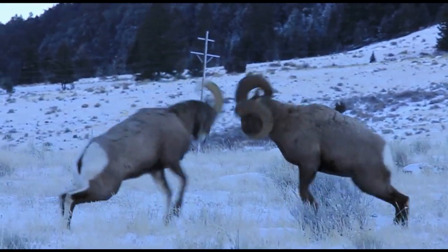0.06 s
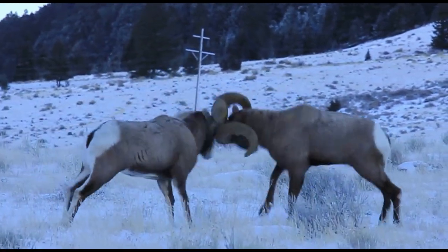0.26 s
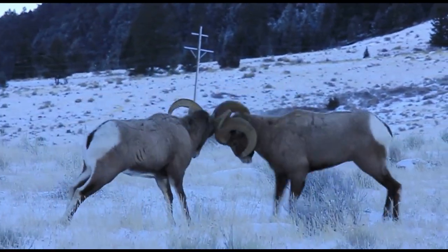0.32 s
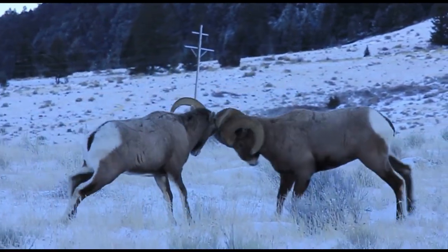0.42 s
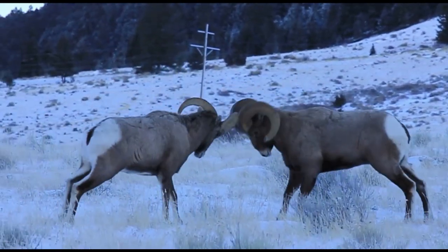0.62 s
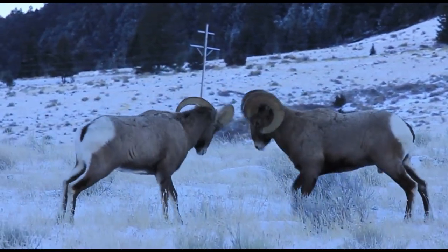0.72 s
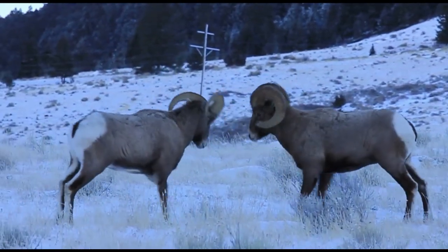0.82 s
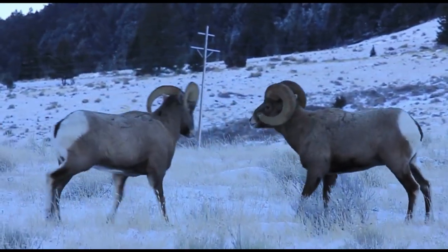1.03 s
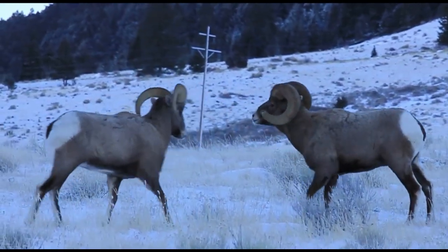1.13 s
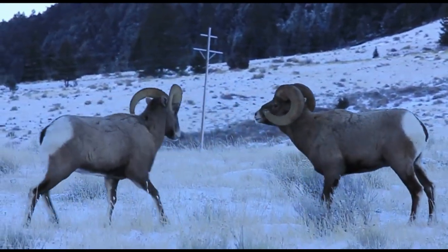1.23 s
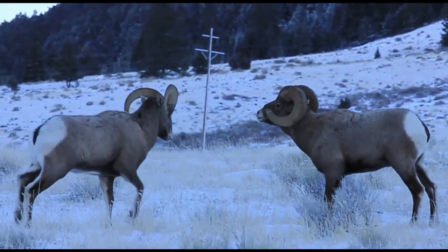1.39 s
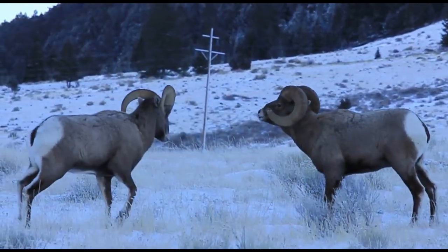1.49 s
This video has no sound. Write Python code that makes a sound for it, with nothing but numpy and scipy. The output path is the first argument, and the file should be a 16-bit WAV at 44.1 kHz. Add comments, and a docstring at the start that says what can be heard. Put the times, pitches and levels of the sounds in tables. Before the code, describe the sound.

A hard, crunching crack of horns rings out as two rams butt heads in a quiet snowy meadow. A weaker hollow knock follows, then a muffled echo and faint hoof steps in frozen grass, over a low distant hum.

```python
"""A snowy mountain meadow: faint hiss and a low distant hum throughout.
At 0.25 s two bighorn rams butt heads: three cracks within 50 ms, horns ringing, ridges crunching,
bodies thudding. The horn tips graze, then knock once more at 0.46 s as they part.
From 0.5 s the wooded slopes return a dull, smeared echo; hooves shuffle in snow and snap frozen grass.
A faint note sounds at 0.66 s. The hum swells near 1.35 s."""
import sys
import numpy as np
from scipy import signal
from scipy.fft import rfft, irfft
from scipy.io import wavfile

SR = 44100
rng = np.random.default_rng(int(sys.argv[2]) if len(sys.argv) > 2 else 0)


def wav_out(sig):
    """Save sig, one row per channel (or a flat mono array), as 16-bit PCM at SR to the path in sys.argv[1]."""
    wavfile.write(sys.argv[1], SR, np.round(np.clip(np.atleast_2d(sig).T, -1, 1) * 32767).astype(np.int16))


N = 68355
T = np.arange(N) / SR

# Open air. Each row: frequency in Hz, relative density in dB.
AIR_SPECTRUM = [(15, -77), (25, -106), (38, -10), (70, -14), (92, 6), (127, -4.5), (170, -5), (206, -5.5),
                (354, -9), (384, -10.5), (416, -10.5), (1400, -24), (1520, -27.5), (13600, -41),
                (15800, -43), (16300, -52)]
# Distant hum. Each row: frequency in Hz, level in dB, width in Hz.
HUM_LINES = [(50, -61, 3), (97.2, -58, 5.9)]
# Swell of the upper hum line. Each row: time in seconds, level in dB.
UPPER_HUM_ENVELOPE = [(0, -54.5), (.9, -64.5), (1.15, -51), (1.35, -47.5), (1.55, -61)]
# Frozen grass. Each row: start in seconds, level in dB, low and high edges in Hz, T60 in seconds.
GRASS_SNAPS = [(0.5475, -38, 1106, 6240, 0.02), (0.547, -28.5, 1000, 2620, 0.041),
               (1.139, -50, 9000, 15000, .025), (1.151, -47, 9000, 15000, .022),
               (1.2190, -41.5, 9000, 14900, 0.0074), (1.3154, -41.5, 3000, 12100, 0.0099)]
# Hooves in snow. Each row: start and length in seconds, hiss and thump levels in dB.
HOOF_SHUFFLES = [(0.495, 0.055, -63, -48), (0.712, 0.05, -57.5, -40.5), (0.762, 0.055, -64, -69),
                 (1.113, 0.048, -85, -61)]
# Powder snow hiss. Each row: frequency in Hz, relative density in dB.
SNOW_SPECTRUM = [(1000, -28), (3000, 22), (6000, -14), (13000, 11.5), (16000, 4)]
# Hoof thump. Each row: frequency in Hz, relative density in dB.
THUMP_SPECTRUM = [(80, -29), (200, 3), (380, 1), (700, -33), (2000, -48)]
# Slope echoes. Each row: delay, swell, hold and T60 in seconds, relative level in dB.
SLOPE_ECHOES = [(0.254, 0.035, 0.0077, 0.21, -21), (0.306, 0.025, 0.041, 0.22, -24.5),
                (0.46, 0.0074, 0.02, .4, -26.5)]
# Colour of the slope echoes. Each row: frequency in Hz, gain in dB.
SLOPE_RESPONSE = [(100, -4), (220, 19), (350, 14.5), (500, 5.5), (585, -0.5), (690, 2), (780, -3),
                  (1050, 0.5), (1400, -7), (1700, -9.5), (3200, -11), (7000, -4.5), (14000, -5)]
# Distinct reflections. Each row: delay in seconds, gain in dB.
DISTINCT_RETURNS = [(.2865, -16.5), (.2965, -41), (.3205, -26), (.530, -36.5)]
# Horn tip knocks. Each row: start in seconds, relative level in dB, tuning ratio, tilt in dB/octave.
TIP_KNOCKS = [(0.3555, -33.5, 0.865, 0), (0.362, -37, 1, 3), (0.3791, -31, 0.85, 1),
              (0.4603, -18.5, .97, 0)]
# Horn tip modes. Each row: base frequency in Hz, relative level in dB, T60 in seconds.
TIP_RESONANCES = [(684, -3.5, 0.014), (880, -2.5, 0.018), (1210, -4, .016), (1360, -14, 0.024),
                  (1766, -7, 0.021), (2224, -11.5, 0.014), (2990, -11, 0.0076), (4960, -28, 0.0066)]
# Horn on horn, plus one ground bounce of the second blow at 0.2738 s. Each row: start in seconds, relative
# level in dB, pitch in Hz, ring gain in dB, ring tuning ratio, ring T60 ratio, crunch gain in dB, click gain in
# dB.
HORN_CONTACTS = [(0.2464, -9, 2770, -5, 1.24, 0.41, 10, 2), (0.2470, -6, 930, -1, 1.01, 1.1, 3.5, -34),
                 (0.2502, -18, 2100, -8, 0.74, 0.41, 6, -3),
                 (0.2659, 1.5, 1054, -13, 1.02, .8, -8.5, -12.5),
                 (0.2668, -4.5, 1910, -3, 0.89, 0.88, -4, -30), (0.2672, -2.5, 688, -15, 1.6, .6, -1, -20),
                 (0.2738, -15.5, 600, -10, 1.0, 1.1, -15, -14),
                 (0.2901, 4, 1417, -23, 1.03, 0.36, -2.5, -9),
                 (0.2909, -8, 770, 8.5, 1.179, 0.38, 7.5, -16),
                 (0.3012, -19.5, 1080, 12, 0.956, 0.6, 1.5, -1),
                 (0.3062, -27.5, 1500, 2, 1.15, 0.47, 9, -25)]
# Horn modes. Each row: base frequency in Hz, relative level in dB, base T60 in seconds.
HORN_RESONANCES = [(406, -15, 0.03), (580.4, -10, 0.045), (910, -17, 0.025), (1150, -17.5, 0.056),
                   (1480, -17, .028), (1910, -9.5, 0.016), (2500, -17, 0.019), (2720, -13, 0.021),
                   (3220, -35, 0.011), (4660, -49, 0.004)]
# Crunch of the horn ridges. Each row: frequency in Hz, relative density in dB.
CRUNCH_SPECTRUM = [(200, -3.5), (600, -2), (1200, -1), (2500, 0), (3300, -8), (3900, -17), (4800, -16),
                   (6000, -26), (15000, -31)]
# Horn radiation. Each row: frequency in Hz, gain in dB.
HORN_RESPONSE = [(200, -5), (400, 0), (690, 2), (1000, -2), (1500, -2.5), (2600, -3), (3300, -2),
                 (3950, -3.5), (4700, 0.5), (6000, -3.5), (10300, -4.5), (14000, -1), (16500, -20)]


def from_db(db):
    """Decibels to gain."""
    return 10 ** (np.asarray(db) / 20)


def unit_rms(x):
    """Scale to unit rms."""
    return x / np.sqrt(np.mean(x ** 2) + 1e-20)


def decay(t60_s):
    """Exponential decay from time zero."""
    return from_db(-60 * T / t60_s)


def swell(start_s, length_s):
    """Smooth rise and fall."""
    return np.sin(np.pi * np.clip((T - start_s) / length_s, 0, 1)) ** 2


def sine(hz):
    """Unit-peak tone."""
    return np.sin(2 * np.pi * hz * T)


def delayed(x, delay_s):
    """Delay, trimmed to N samples."""
    return np.concatenate([np.zeros(int(round(delay_s * SR))), x])[:N]


def butter(x, hz, kind, order=2):
    """Butterworth low- or high-pass."""
    return signal.sosfilt(signal.butter(order, hz, kind, fs=SR, output="sos"), x + 1e-18)


def coloured(x, spectrum):
    """Filter by a (Hz, dB) curve; minimum phase, so nothing sounds early."""
    hz, db = np.transpose(spectrum)
    bins_hz = np.maximum(np.fft.rfftfreq(N, 1 / SR), 1)
    gain = from_db(np.interp(np.log(bins_hz), np.log(hz), db))
    cepstrum = irfft(np.log(gain), N)
    causal = cepstrum * (1 + np.sign(np.fft.fftfreq(N)))
    return irfft(rfft(x) * np.exp(rfft(causal)), N)


def noise(spectrum):
    """Unit-rms coloured noise."""
    return unit_rms(coloured(rng.standard_normal(N), spectrum))


def drift(rate_hz):
    """Slow random wander, unit rms."""
    return unit_rms(butter(rng.standard_normal(2 * N), rate_hz, "low")[N:])


def struck(modes, tuning, t60_ratio=1, tilt_db_per_oct=0, pivot_hz=1000):
    """Decaying modes; contact spot and pressure retune, damp and tilt them."""
    out = 0
    for k, (hz, db, t60_s) in enumerate(modes):
        gain = from_db(db + tilt_db_per_oct * np.log2(hz / pivot_hz))
        out += (-1) ** k * gain * sine(hz * tuning) * decay(t60_s * t60_ratio)
    return out


def hum_line(hz, width_hz, waver_db=1.5):
    """Unit-rms tone wavering in pitch and level."""
    phase = 2 * np.pi * np.cumsum(hz + width_hz / 2 * drift(width_hz)) / SR
    return unit_rms(np.sin(phase) * from_db(waver_db * drift(rate_hz=22)))


def air_and_hum(air_db=-46):
    """Open-air hiss and three distant hum lines; the top one fades and swells."""
    lower = sum(from_db(db) * hum_line(hz, width_hz) for hz, db, width_hz in HUM_LINES)
    upper_db = np.interp(T, *np.transpose(UPPER_HUM_ENVELOPE))
    upper = from_db(upper_db) * hum_line(hz=172.3, width_hz=9.9)
    return from_db(air_db) * noise(AIR_SPECTRUM) + lower + upper


def grass():
    """Frozen grass snaps underfoot: band-limited noise bursts."""
    out = 0
    for start_s, db, low_hz, high_hz, t60_s in GRASS_SNAPS:
        burst = butter(rng.standard_normal(N) * decay(t60_s), low_hz, "high")
        out += delayed(from_db(db) * butter(burst, high_hz, "low", order=4), start_s)
    return out


def hooves(stamp_db=-39):
    """One firm stamp, and soft thumps with puffs of powder snow."""
    hiss, thump = noise(SNOW_SPECTRUM), noise(THUMP_SPECTRUM)
    out = from_db(stamp_db) * swell(start_s=0.513, length_s=0.025) * sine(hz=228)
    for start_s, length_s, hiss_db, thump_db in HOOF_SHUFFLES:
        out += swell(start_s, length_s) * (from_db(hiss_db) * hiss + from_db(thump_db) * thump)
    return out


def faint_note(level_db=-37.5):
    """Brief tone at the end of the first echo."""
    return from_db(level_db) * swell(start_s=0.66, length_s=0.027) * sine(hz=1030)


def slope_echoes(x):
    """Each wooded slope returns a dull swarm of reflections that swells, holds and dies."""
    response = 0
    for delay_s, swell_s, hold_s, t60_s, db in SLOPE_ECHOES:
        rise = np.minimum(T / swell_s, 1)
        fall = np.interp(T - swell_s - hold_s, T, decay(t60_s))
        swarm = rng.standard_normal(N) * rise * fall
        response += delayed(from_db(db) * swarm / np.linalg.norm(swarm), delay_s)
    return signal.fftconvolve(x, coloured(response, SLOPE_RESPONSE))[:N]


def distinct_returns(x, centre_hz=572, width_hz=98):
    """Single reflections that keep only the hollow core of the clash."""
    core = signal.lfilter(*signal.iirpeak(centre_hz, centre_hz / width_hz, fs=SR), x)
    return sum(delayed(from_db(db) * core, delay_s) for delay_s, db in DISTINCT_RETURNS)


def brush_scatter(x, gain_db=-20, rise_s=0.0092):
    """Nearby ground and brush add a very short tail."""
    swarm = rng.standard_normal(N) * (1 - np.exp(-T / rise_s)) * decay(t60_s=0.093)
    response = from_db(gain_db) * butter(swarm / np.linalg.norm(swarm), hz=13000, kind="low")
    return signal.fftconvolve(x, response)[:N]


def body_thud(level_db=-29.5):
    """The bodies take the blow: one low damped mode."""
    return delayed(from_db(level_db) * sine(hz=136) * decay(t60_s=0.061), delay_s=0.2905)


def horn_tips(click_db=-12.5):
    """Hollow knocks as the horns slide off each other."""
    click = from_db(click_db) * signal.unit_impulse(N)
    out = 0
    for start_s, db, tuning, tilt_db_per_oct in TIP_KNOCKS:
        ring = struck(TIP_RESONANCES, tuning, tilt_db_per_oct=tilt_db_per_oct)
        hollow = butter(ring, hz=3750, kind="low")
        out += delayed(from_db(db) * (hollow + click), start_s)
    return butter(out, hz=474, kind="high")


def contact_click(click_db=0.5, crackle_db=-15.5, lag_s=0.0002):
    """Sharp front of a hard contact, with fine crackle behind it."""
    click = butter(signal.unit_impulse(N, int(lag_s * SR)), hz=4800, kind="high")
    crackle = butter(rng.standard_normal(N) * decay(t60_s=0.0047), hz=6700, kind="high")
    return from_db(click_db) * click + from_db(crackle_db) * crackle


def horn_blow(pitch_hz, ring_db, tuning, t60_ratio, crunch_db, click_db):
    """One contact: short pressure swing, horn ring, crunch of the ridges, click."""
    swing_rise_cycles, ring_rise_s, crunch_trim_db = 0.35, 0.00098, -13.5
    age = T * pitch_hz / swing_rise_cycles
    swing = -sine(pitch_hz) * age * np.exp(1 - age)
    ring = struck(HORN_RESONANCES, tuning, t60_ratio) * (1 - np.exp(-T / ring_rise_s))
    knock = butter(swing + from_db(ring_db) * ring, hz=5100, kind="low")
    crunch = from_db(crunch_db + crunch_trim_db) * noise(CRUNCH_SPECTRUM) * decay(t60_s=0.019)
    low_edge_hz = 0.25 * pitch_hz  # a quick blow moves little air below this
    return butter(knock + crunch, low_edge_hz, "high") + from_db(click_db) * contact_click()


def horn_cracks():
    """All contacts and the ground bounce, coloured by the horns' radiation."""
    cracks = sum(delayed(from_db(db) * horn_blow(*blow), start_s)
                 for start_s, db, *blow in HORN_CONTACTS)
    return coloured(cracks, HORN_RESPONSE)


def scene():
    """Clash, reflections, footwork and meadow; mono."""
    clash = horn_cracks() + body_thud() + horn_tips()
    reflections = brush_scatter(clash) + slope_echoes(clash) + distinct_returns(clash)
    return (clash + reflections + faint_note() + hooves() + grass() + air_and_hum())[None]


def record(dry):
    """Soft clip, then a steep low-pass."""
    ceiling, ripple_db, cutoff_hz = 1.2, 0.2, 16500
    rounded = ceiling * np.tanh(dry / ceiling)
    return signal.sosfilt(signal.cheby1(12, ripple_db, cutoff_hz, fs=SR, output="sos"), rounded)


dry = scene()
out = record(dry)
wav_out(out)
```